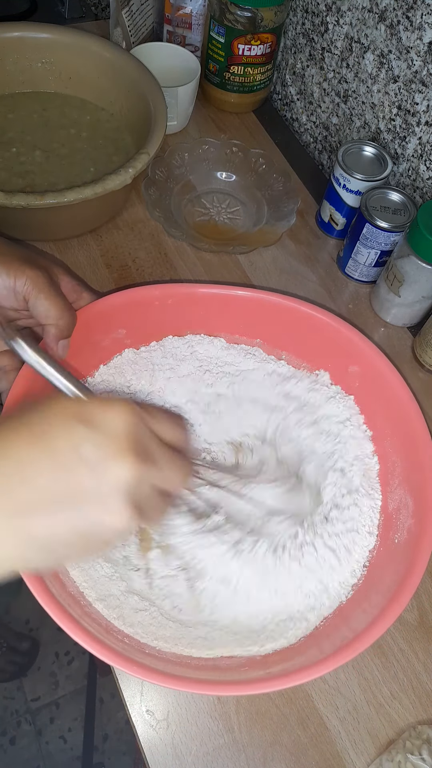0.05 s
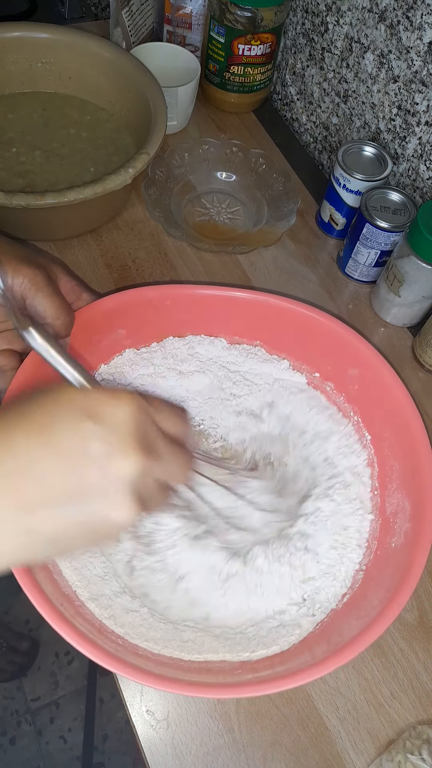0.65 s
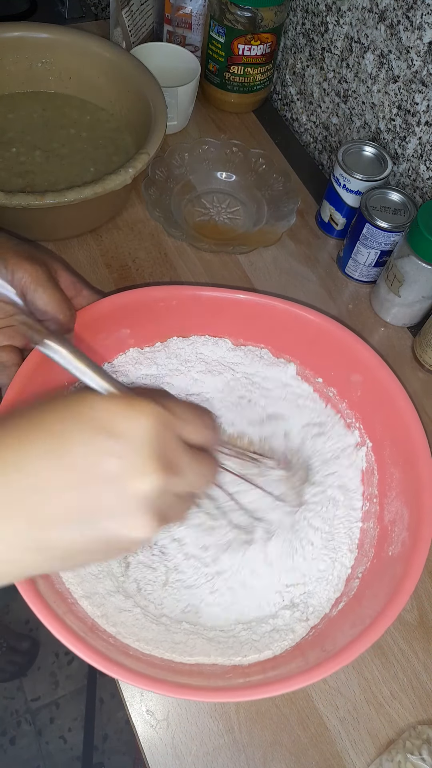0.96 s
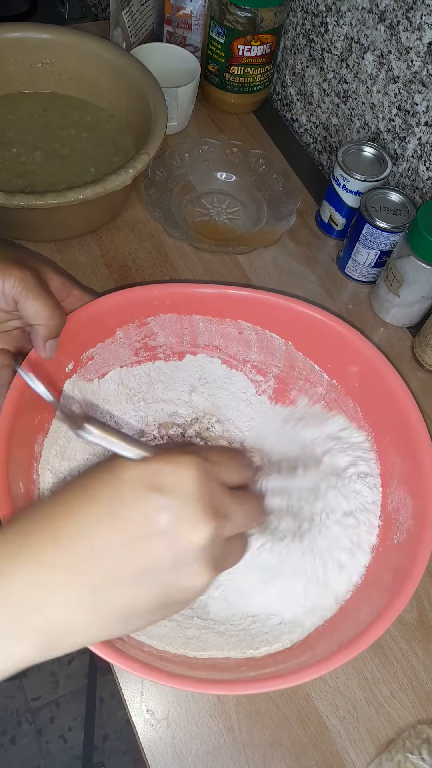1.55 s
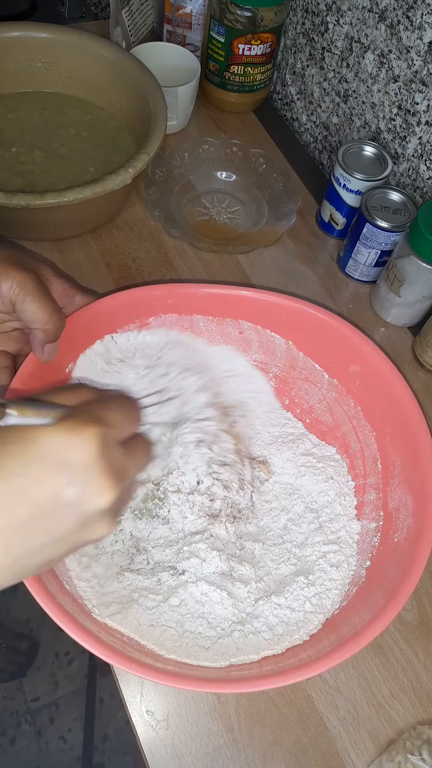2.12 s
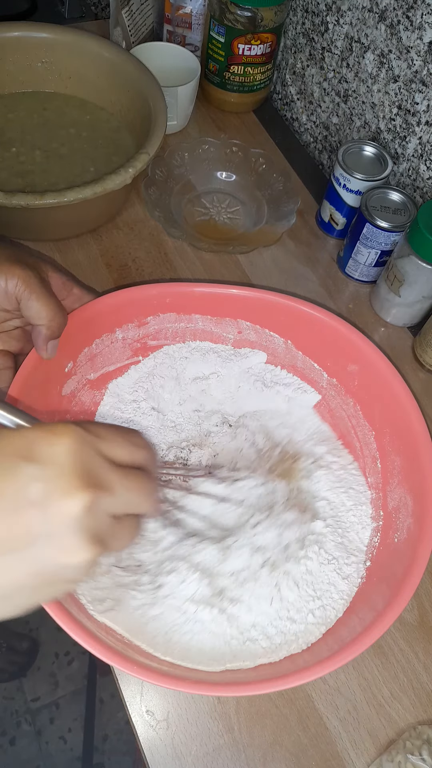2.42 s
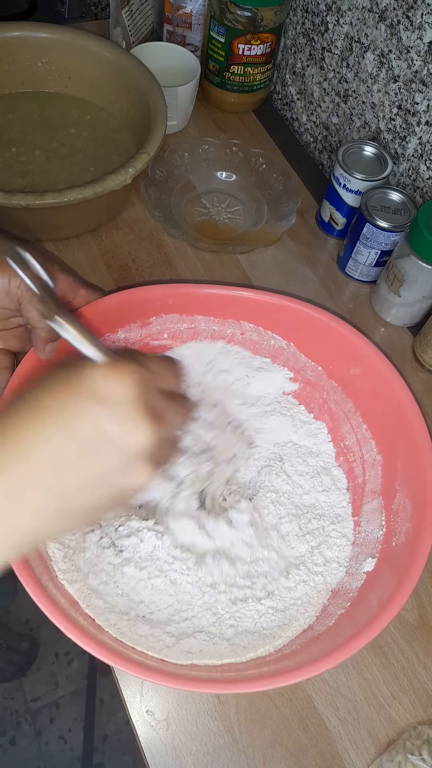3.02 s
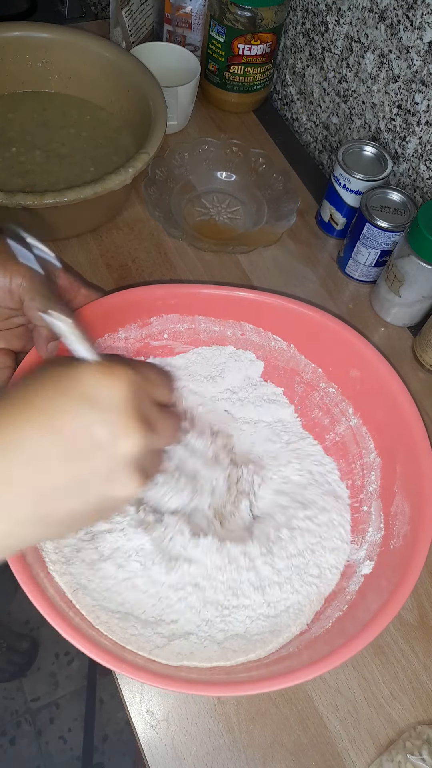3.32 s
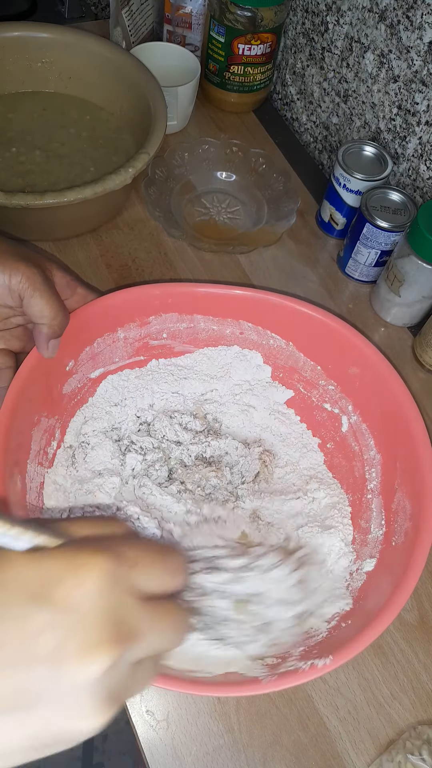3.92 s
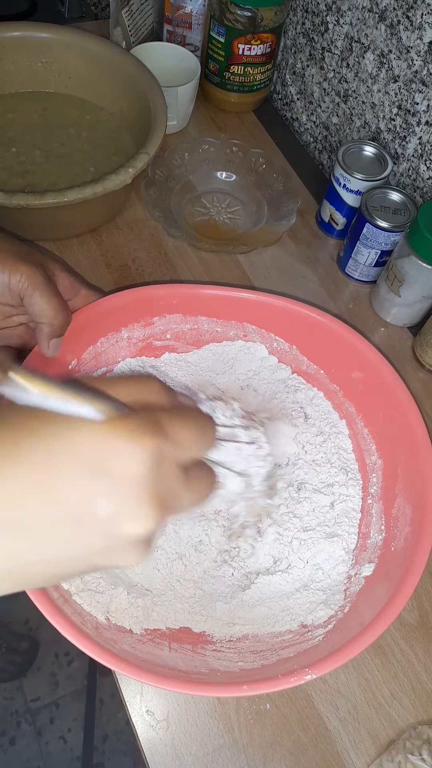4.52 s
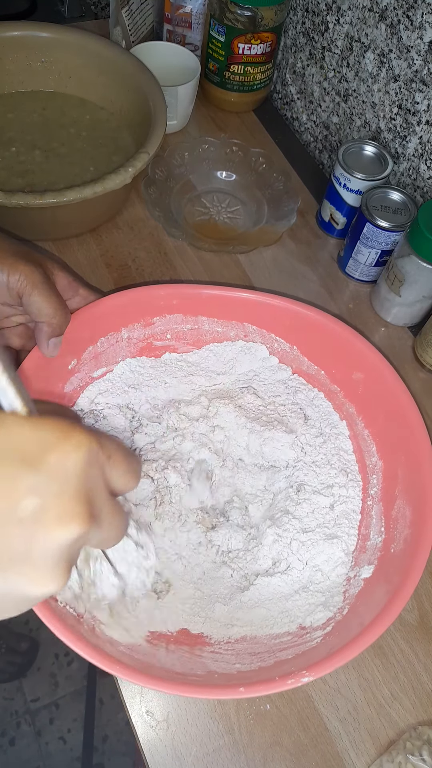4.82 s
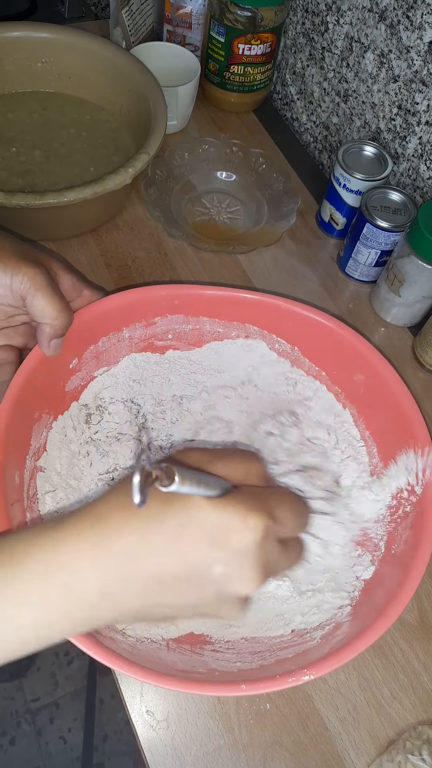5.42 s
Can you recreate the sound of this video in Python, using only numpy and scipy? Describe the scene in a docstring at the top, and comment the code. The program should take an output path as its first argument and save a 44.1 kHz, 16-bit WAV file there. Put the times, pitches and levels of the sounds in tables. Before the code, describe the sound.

A wire whisk stirs dry flour in a wide plastic bowl on a kitchen counter. Quick, uneven strokes crunch softly through the powder and hiss along the wall, drawing a low drone from the bowl. The wires tick and skid on the plastic throughout. In the second half the bowl rocks and thumps hollowly on the counter a few times. The sound is close and in stereo, over faint room tone.

```python
"""Close on a wide plastic bowl on a kitchen counter, in stereo: a wire whisk stirs dry flour.
Quick strokes open the take, the wires crunching through the powder and hissing along the wall.
Their drag keeps the bowl's lowest mode droning, strongest a little before 2 s. Then the bowl rocks
and thumps on the counter, hardest at 3.7 s. Wires tick and skid on the plastic throughout, sharply
near 4.3 s; a few more strokes and soft thumps end the take over quiet room tone."""
import sys
import numpy as np
from scipy import signal
from scipy.fft import rfft, irfft
from scipy.io import wavfile

SR = 44100
rng = np.random.default_rng(int(sys.argv[2]) if len(sys.argv) > 2 else 0)


def output_pcm(signal):
    """Save a mono or channel-first signal as 16-bit PCM at the path in sys.argv[1].

    Samples are clipped to [-1, 1] before scaling.
    """
    pcm = np.clip(np.atleast_2d(signal).T, -1, 1) * 32767
    wavfile.write(sys.argv[1], SR, np.round(pcm).astype(np.int16))


N = 245195
TIME = np.arange(N) / SR
FREQS = np.maximum(np.fft.rfftfreq(N, 1 / SR), 1)

# Room tone in the kitchen. Each row: frequency in Hz, relative level in dB.
ROOM_TONE = [(25, -8.5), (50, 10.5), (100, 14.5), (200, 3.5), (400, -2.5), (1000, -29.5), (2000, -25.5),
             (4000, -40.5), (6500, -40), (9000, -30.5), (16000, -35.5)]
# The kitchen's decay. Each row: frequency in Hz, t60 in seconds.
KITCHEN_DECAY = [(150, 0.5), (600, 0.31), (2500, 0.7), (12000, 0.08)]
# How alike the two microphones sound. Each row: frequency in Hz, correlation.
MIC_LIKENESS = [(60, 0.97), (150, 0.87), (300, 0.85), (600, 0.67), (1100, 0.34), (2200, 0.03),
                (4500, -0.13), (8000, 0.079), (16000, -0.046)]
# Balance of the microphones. Each row: frequency in Hz, left minus right in dB.
MIC_BALANCE = [(80, 0.6), (250, 0.5), (500, -2), (1200, 3.5), (2400, 2.5), (4400, 0.8), (8000, 2.5),
               (15000, 1.5)]

# The bowl's lowest mode as the grip bends it. Each row: time in seconds, pitch in Hz.
DRONE_PITCH = [(0.0, 72.34), (1.1, 74.5), (1.85, 76.13), (2.15, 71), (2.6, 68.92), (5.15, 69.65),
               (5.45, 74.2)]
# That mode under the whisk's drag. Each row: time in seconds, level in dB.
DRONE_LEVEL = [(0.0, -48.5), (0.15, -46.5), (0.4, -53.5), (0.56, -42), (0.68, -56.5), (0.79, -45),
               (1.08, -43), (1.15, -57), (1.27, -37.5), (1.49, -41), (1.69, -32), (1.86, -36), (1.92, -33),
               (2.18, -49.5), (2.24, -39), (2.38, -47.5), (2.48, -42.5), (2.56, -50), (2.8, -36.5),
               (3.13, -47), (3.19, -39.5), (3.67, -39), (3.75, -33), (4.06, -49), (4.24, -42.5),
               (4.75, -54.5), (4.91, -45.5), (5.25, -61), (5.36, -49), (5.56, -61)]
# Modes of the bowl on the counter. Each row: frequency in Hz, relative level in dB, t60 in seconds,
# left minus right in dB.
BOWL_MODES = [(139, -19.5, 0.033, -9), (144.4, -3.5, 0.2, 2.5), (180, -14.5, 0.22, 0.5),
              (290, -32.5, 0.033, 3.5), (293.7, -17.5, 0.095, -3.5), (307, -6, 0.03, 10),
              (322, -20.5, 0.11, 3), (381, -12.5, 0.1, 4), (403, -17.5, 0.068, 20), (457, -18.5, 0.11, 6.5),
              (493.5, -28, 0.13, -8), (536, -20.5, 0.098, 11), (620, -25.5, 0.21, 4.5),
              (698, -16.5, 0.036, -19), (748, -25.5, 0.1, 12), (772, -19, 0.067, 7),
              (848, -33, 0.055, -11.5), (1040, -27.5, 0.086, 15), (1098, -32.5, 0.079, 1.5),
              (1305, -28, .09, 17), (1296, -28.5, 0.039, 15.5)]
# The bowl thumps down. Each row: start in seconds, relative level in dB, softness as a cut-off in Hz.
THUMPS = [(2.32, -33, 1500), (2.7647, -20, 523), (2.8427, -35, 1530), (3.525, -36.5, 600),
          (3.6985, -11, 900), (4.4176, -33.5, 460), (4.852, -39.5, 560), (5.2358, -22, 380),
          (5.396, -28.5, 190)]

# A slipping wire sings. Each row: start in seconds, nominal pitch in Hz, level in dB.
PINGS = [(3.012, 9350, -57), (3.350, 9500, -56.5), (4.226, 5594, -46), (5.068, 7800, -64)]
# A wire skids over the plastic. Each row: middle in seconds, half length in seconds, hiss in dB,
# rasp in dB, pitch of the rasp in Hz.
SKIDS = [(0.078, 0.0027, -66, -46.5, 1640), (0.4, 0.023, -65, -61, 2640), (0.411, 0.01, -63, -50.5, 1110),
         (0.699, 0.0053, -58, -44.5, 1080), (0.856, 0.007, -75, -49, 585), (0.97, 0.0018, -64, -60, 1700),
         (1.285, .025, -68.5, -67.5, 1800), (1.478, 0.043, -70, -57.5, 2050),
         (2.036, 0.017, -66.5, -59, 1270), (2.343, 0.015, -76, -52, 636), (2.746, 0.017, -67, -50.5, 1220),
         (3.019, 0.011, -59, -60, 1600), (3.241, 0.0091, -57, -49.5, 1920),
         (3.347, 0.0053, -61, -54.5, 2640), (4.227, 0.0052, -48.5, -53.5, 2680),
         (4.266, 0.0032, -54, -39, 1260), (4.287, 0.0051, -46.5, -43.5, 1190),
         (5.067, 0.0061, -52.5, -56, 1350), (5.401, .005, -61.5, -56, 1104)]
# A wire ticks on the plastic. Each row: start in seconds, relative level in dB, cut-off in Hz
# (low where flour cushions the wire).
TICKS = [(0.078, -35, 4500), (0.134, -37, 5000), (0.8457, -34.5, 1300), (0.971, -35.5, 4000),
         (1.118, -39, 1900), (1.148, -37.5, 1600), (1.447, -34, 796), (1.505, -38, 2000),
         (2.028, -46, 4500), (2.320, -38, 8000), (2.844, -40, 3800), (3.143, -38, 2500),
         (3.402, -36.5, 2500), (3.472, -36, 1490), (3.7006, -25.5, 2630), (4.095, -39.5, 7000),
         (4.264, -23.5, 1770), (4.317, -34, 2000), (4.330, -39, 2200), (4.380, -52, 2200),
         (5.2344, -45.5, 2000), (5.379, -49.5, 1800)]
# The wall's ring after a tick. Each row: frequency in Hz, relative level in dB.
TICK_SPECTRUM = [(150, -25), (350, 2.5), (800, -12), (1500, -7), (2600, -2), (3800, -9), (8000, -3),
                 (16000, -5)]

# Ringing of the bowl's hollow. Each row: frequency in Hz, t60 in seconds.
HOLLOW_DECAY = [(200, 0.17), (800, 0.083), (3000, 0.1), (12000, 0.054)]
# Wall and wire resonances that colour the rubbing. Each row: centre in Hz, width in Hz, gain in dB.
WALL_RESONANCES = [(146.7, 10.7, 21), (190.6, 11, 0), (291.6, 16, 6), (383, 67, 6), (402, 13, 1),
                   (522, 18, 5.5), (643, 30, 4.5), (770, 220, 5), (1924, 54, 4), (2050, 81, 1.5),
                   (2895, 42, 2), (3310, 53, -1), (4250, 130, 2.5), (5220, 200, 1), (6450, 170, -0.5),
                   (8150, 390, 3), (9500, 400, 2)]
# Flour pushed, crushed, ground thin and scraped. Each row: frequency in Hz, relative level in dB.
PUSH_SPECTRUM = [(60, -25), (100, 7), (150, -1.5), (200, 9.5), (255, -5), (320, 4.5), (450, -2.5),
                 (600, -5), (850, -5.5), (1200, -13), (2000, -19.5), (5000, -75)]
CRUNCH_SPECTRUM = [(300, -26.5), (700, -6.5), (1100, 3.5), (1400, 4), (1700, -4.5), (2100, -2),
                   (2600, -10.5), (3300, -26.5), (4800, -35), (7000, -39)]
GRIT_SPECTRUM = [(1200, -29), (2200, -5), (3100, -1.5), (4000, -4), (5000, -4), (6200, -15), (10000, -38)]
SCRAPE_SPECTRUM = [(500, -27), (1500, -2), (3000, 0.5), (4200, -2), (5200, 0.5), (6000, -2.5), (7600, 1),
                   (8600, -3.5), (9500, 0.5), (10500, -2.5), (13000, 0), (16000, -3)]
# Strokes drive the wires out to the wall. Each row: start, rise, hold and t60 of the retreat,
# all in seconds, then relative levels of crunch and scrape in dB.
STROKES = [(-0.1, 0.072, 0.19, 1.5, -59, -66.5), (0.045, 0.044, 0.041, 0.57, -54.5, -54.5),
           (0.226, 0.018, .015, 0.7, -53, -60.5), (0.347, 0.044, 0.044, 0.55, -49, -53.5),
           (0.507, 0.028, 0.047, 1.4, -53, -64), (0.637, 0.051, 0.02, 0.7, -52, -56),
           (0.758, 0.073, 0.15, 0.52, -57, -66.5), (1.275, .13, 0.13, 0.6, -70, -61),
           (2.009, 0.15, 0.026, 0.69, -59, -58), (2.242, 0.036, 0.017, 2.2, -60, -66.5),
           (2.61, .09, 0.76, 0.44, -58, -60.5), (3.202, .025, 0.018, 1.8, -52, -65),
           (3.872, 0.21, 0.027, 0.49, -61.5, -61), (4.202, 0.04, 0.062, 0.22, -49, -57),
           (4.817, 0.2, .005, 0.43, -67.5, -65.5), (4.952, 0.036, .003, 0.14, -69, -56.5),
           (5.033, 0.016, 0.013, .23, -52.5, -59), (5.365, 0.11, .008, .3, -61, -59),
           (5.51, 0.046, .02, .3, -63, -61.5)]
# Ploughing through the heap between strokes. Each row: time in seconds, relative level in dB.
PLOUGHING = [(0.0, -63.5), (0.5, -61), (0.97, -55.5), (1.19, -57.5), (1.48, -51), (1.85, -58),
             (2.55, -58.5), (3.05, -55), (3.5, -60.5), (4.1, -69.5), (4.3, -52), (4.43, -64.5), (4.72, -72),
             (4.93, -63), (5.2, -69.5), (5.56, -59)]


def from_db(db):
    """Decibels to gain."""
    return 10 ** (np.asarray(db) / 20)


def unit_rms(x):
    """Scale to unit power."""
    return x / np.sqrt(np.mean(x ** 2) + 1e-20)


def in_time(points):
    """Read a curve sample by sample."""
    return np.interp(TIME, *np.transpose(points))


def at_hz(points, hz):
    """Read a curve on a log-frequency axis."""
    f, value = np.transpose(points)
    return np.interp(np.log(hz), np.log(f), value)


def drift(rate):
    """A smooth random wander of rms 1 that changes about rate times a second."""
    return unit_rms(irfft(rfft(rng.standard_normal(N)) / (1 + (FREQS / rate) ** 2), N))


def convolve(x, response):
    """Pass a signal through a stereo response."""
    return signal.fftconvolve(np.atleast_2d(x), response, axes=1)[:, :N]


def spread(pair, hz):
    """Mix an unrelated pair onto the two microphones, alike in the bass and unlike in the treble."""
    alike = at_hz(MIC_LIKENESS, hz)
    mid = np.sqrt((1 + alike) / 2) * pair[0]
    side = np.sqrt((1 - alike) / 2) * pair[1]
    return np.array([mid + side, mid - side])


def coloured(pair, spectrum, peaks=()):
    """Give an excitation a spectrum and resonances; stereo, rms 1."""
    peaks_db = sum(db / (1 + (2 * (FREQS - hz) / width) ** 2) for hz, width, db in peaks)
    gain = from_db(at_hz(spectrum, FREQS) + peaks_db)
    return unit_rms(irfft(spread(rfft(pair), FREQS) * gain, N))


def grains(per_s, size_db, clump_db, clump_rate):
    """Tiny slips at random, of uneven size, bunched as wire after wire passes."""
    born = rng.random(N) < per_s / SR
    sizes = from_db(size_db * np.minimum(rng.exponential(1, N), 4) + clump_db * drift(clump_rate))
    return born * sizes * rng.standard_normal((2, N))


def ring(clicks, hz, t60):
    """One damped mode: a unit click sets a sine of height 1 ringing."""
    decay, step = from_db(-60 / (t60 * SR)), 2 * np.pi * hz / SR
    return signal.lfilter([0, np.sin(step)], [1, -2 * decay * np.cos(step), decay ** 2], clicks + 1e-18)


def dying_noise(t60s, spectrum):
    """A stereo response of unit energy a side: dense modes that die away octave by octave."""
    size = SR // 3
    hz = np.maximum(np.fft.rfftfreq(size, 1 / SR), 1)
    noise = spread(rfft(rng.standard_normal((2, size))), hz) * from_db(at_hz(spectrum, hz))
    out = 0
    for centre in 125 * 2 ** np.arange(8):
        band = irfft(noise * np.maximum(1 - abs(np.log2(hz / centre)), 0), size)
        out = out + band * np.exp(-np.log(1000) * TIME[:size] / at_hz(t60s, centre))
    return out / np.sqrt(np.sum(out ** 2) / 2)


def room_tone():
    """The kitchen behind the bowl: a faint, steady, low noise."""
    return from_db(-53.5) * coloured(rng.standard_normal((2, N)), ROOM_TONE)


def kitchen_reverb(direct):
    """The room returns a short ring, well under the close sound."""
    colour = [(100, -10), (300, 0), (800, -2.5), (3000, 4.5), (14000, -17)]
    return from_db(-12) * convolve(direct.mean(axis=0), dying_noise(KITCHEN_DECAY, colour))


def bowl_drone():
    """Friction keeps the lowest mode swinging, unevenly and with faint overtones."""
    hz = in_time(DRONE_PITCH) + 0.76 * drift(rate=21.3)
    phase = 2 * np.pi * np.cumsum(hz) / SR
    wave = np.sin(phase) + from_db(-27.5) * np.sin(2 * phase) + from_db(-29) * np.sin(3 * phase)
    waver_db = 1.8 * drift(rate=10)
    return np.sqrt(2) * from_db(in_time(DRONE_LEVEL) - 0.1 + waver_db) * wave


def bowl_thumps():
    """Each soft blow on the counter sets the bowl's modes ringing, a little differently every time."""
    starts, blow_db, cutoff_hz = np.transpose(THUMPS)
    out = np.zeros((2, N))
    for hz, mode_db, t60, lean_db in BOWL_MODES:
        clicks = np.zeros(N)
        # the blow takes a moment to spread over the shell
        arrival = ((starts + rng.uniform(0, .001)) * SR).astype(int)
        force = from_db(blow_db + mode_db + rng.normal(0, 1, len(starts)))
        clicks[arrival] = force / np.hypot(1, (hz / cutoff_hz) ** 2)
        out += ring(clicks, hz, t60) * from_db([[lean_db / 2], [-lean_db / 2]])
    # the thumps carry neither deep bass nor treble
    return signal.sosfilt(signal.butter(3, [110, 1600], "band", fs=SR, output="sos"), out)


def wire_pings():
    """A slipping wire rings in a close pair of modes that the flour soon damps."""
    out = np.zeros((2, N))
    for start, hz, db in PINGS:
        click = from_db(db) * (np.arange(N) == int(start * SR))
        lower, upper = ring(click, hz * 0.91, t60=0.082), ring(click, hz * 1.015, t60=0.04)
        out += [lower + .5 * upper, upper - .5 * lower]
    return out


def wire_skids():
    """Brief stick-slip on the plastic: a hiss, and a rasp pitched by where the wire touches."""
    slips = grains(per_s=8000, size_db=1.5, clump_db=1, clump_rate=100)
    hiss_gain, rasp = np.zeros(N), np.zeros((2, N))
    for middle, half_length, hiss_db, rasp_db, hz in SKIDS:
        span = abs(TIME - middle) < .12
        touch = np.exp(-.5 * ((TIME[span] - middle) / half_length) ** 2)
        hiss_gain[span] += from_db(hiss_db) * touch
        band = signal.butter(2, [hz / 1.25, hz * 1.25], "band", fs=SR)
        wall = signal.lfilter(*band, spread(slips[:, span], hz))
        rasp[:, span] += from_db(rasp_db) * touch * unit_rms(wall)
    return rasp + hiss_gain * coloured(slips, SCRAPE_SPECTRUM, WALL_RESONANCES)


def wire_ticks():
    """A wire snaps against the wall: a dry crack, then many modes that die in hundredths of a second."""
    clicks = np.zeros(N)
    for start, db, cutoff_hz in TICKS:
        contact = signal.lfilter(*signal.butter(2, cutoff_hz, fs=SR), signal.unit_impulse(256))
        first = int(start * SR)
        clicks[first:first + len(contact)] += from_db(db) * contact
    crack = signal.lfilter(*signal.butter(2, [400, 1500], "band", fs=SR), clicks)
    wall_t60s = [(300, 0.052), (1500, 0.039), (10000, 0.017)]
    wall = convolve(clicks, dying_noise(wall_t60s, TICK_SPECTRUM))
    return from_db(19) * crack + from_db(13.5) * wall


def bowl_hollow(rub):
    """Many small resonances add a hollow ring whose colour shifts as the whisk moves round; rms 1."""
    colour = [(150, -10), (500, 1), (1200, 1), (3000, -1), (16000, -3)]
    near, far = (convolve(rub, dying_noise(HOLLOW_DECAY, colour)) for _ in range(2))
    angle = 2 * np.pi * 1.5 * TIME + drift(rate=4)  # about 1.5 turns a second
    return unit_rms(rub + from_db(-7) * (np.cos(angle) * near + np.sin(angle) * far))


def wall_strokes():
    """Each stroke swells, bears on the wall and dies away; gains of the crunch and of the scrape."""
    crunch_power, scrape_power = np.zeros(N), np.zeros(N)
    for start, rise, hold, t60, crunch_db, scrape_db in STROKES:
        age = TIME - start
        swell = np.sin(np.pi / 2 * np.clip(age / rise, 0, 1)) ** 2
        contact = swell * np.exp(-np.log(1000) * np.maximum(age - rise - hold, 0) / t60)
        crunch_power += (from_db(crunch_db) * contact) ** 2
        scrape_power += (from_db(scrape_db) * contact) ** 2
    return np.sqrt(crunch_power), np.sqrt(scrape_power)


def stirring_levels():
    """Steady ploughing and the strokes add up to the levels of push, crunch and scrape, in dB."""
    heap_db = in_time(PLOUGHING)
    stroke_crunch, stroke_scrape = wall_strokes()
    push = np.hypot(from_db(heap_db), from_db(-5.5) * stroke_crunch)  # a stroke shoves powder ahead
    crunch = np.hypot(from_db(heap_db - 11.5), stroke_crunch)  # ploughing alone crunches softly
    scrape = np.hypot(from_db(heap_db - 26), stroke_scrape)  # and barely hisses
    # the load varies as wire after wire digs in
    flutter_db = -0.4 * drift(rate=15) * np.array([[1], [1], [.5]])
    return 20 * np.log10([push, crunch, scrape]) + flutter_db


def whisked_flour():
    """The wires push the powder, crush it and drag it along the wall."""
    push_db, crunch_db, scrape_db = stirring_levels()
    # the deep push is a smooth rub; the crunch is the grainiest
    push = bowl_hollow(grains(per_s=7000, size_db=1.0, clump_db=1.2, clump_rate=20))
    crunch = bowl_hollow(grains(per_s=9000, size_db=2.1, clump_db=2.1, clump_rate=50))
    scrape = bowl_hollow(grains(per_s=24000, size_db=1.2, clump_db=1.1, clump_rate=60))
    # the crunch turns gritty where only a thin layer lies between wire and wall
    grit_db = 0.48 * crunch_db + 0.58 * scrape_db
    return (from_db(push_db + 4.0) * coloured(push, PUSH_SPECTRUM, WALL_RESONANCES)
            + from_db(crunch_db - 3.0) * coloured(crunch, CRUNCH_SPECTRUM, WALL_RESONANCES)
            + from_db(grit_db - 1.0) * coloured(crunch, GRIT_SPECTRUM, WALL_RESONANCES)
            + from_db(scrape_db + 0.55) * coloured(scrape, SCRAPE_SPECTRUM, WALL_RESONANCES))


def scene():
    """The bowl close to the microphones; behind it, the kitchen's short ring and room tone."""
    contacts = bowl_thumps() + wire_ticks() + wire_skids() + wire_pings()
    kitchen = kitchen_reverb(contacts) + room_tone()
    return kitchen + contacts + whisked_flour() + bowl_drone()


def record(dry):
    """The left microphone hears more of the bowl, except around 500 Hz; the top is cut steeply."""
    cutoff_hz = 15780
    balance = from_db(at_hz(MIC_BALANCE, FREQS) * np.array([[.5], [-.5]]))
    top_cut = 1 / np.sqrt(1 + (FREQS / cutoff_hz) ** 300)
    return irfft(rfft(dry) * balance * top_cut, N)


dry = scene()
out = record(dry)
output_pcm(out)
```